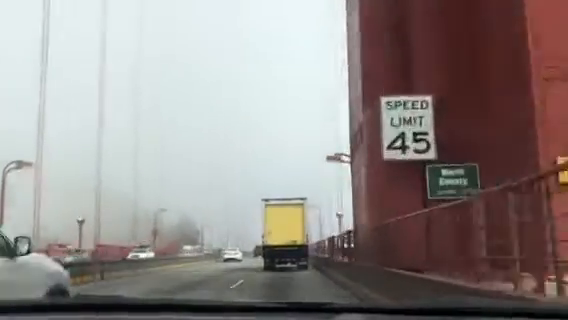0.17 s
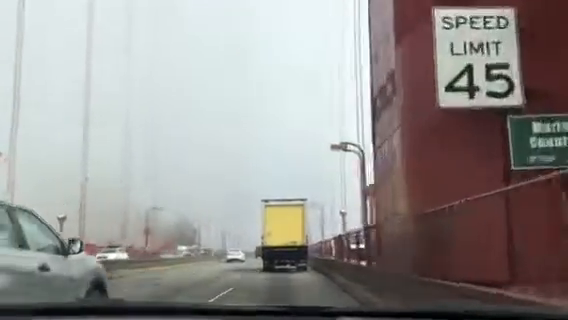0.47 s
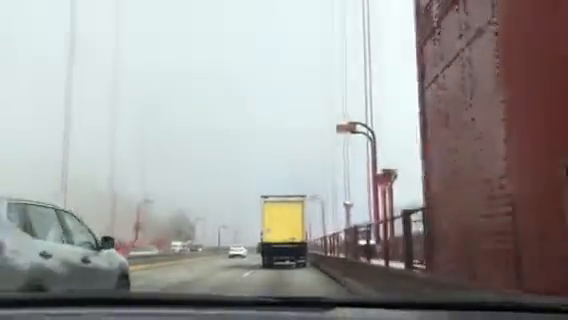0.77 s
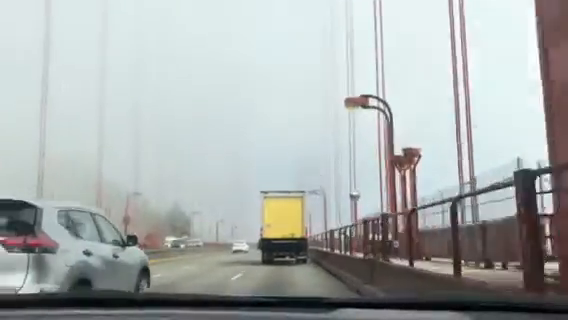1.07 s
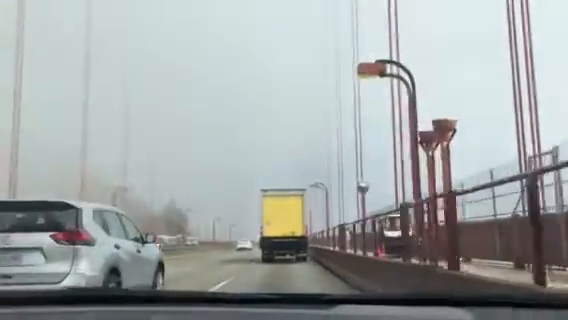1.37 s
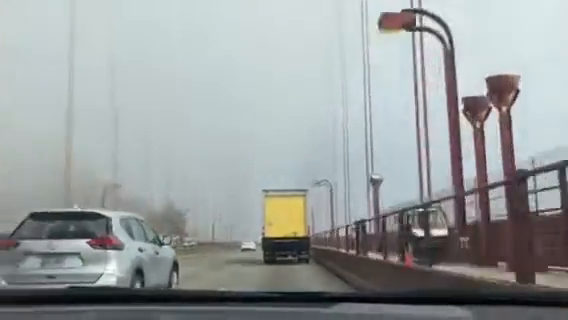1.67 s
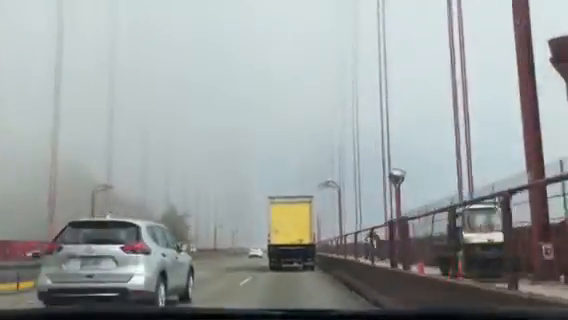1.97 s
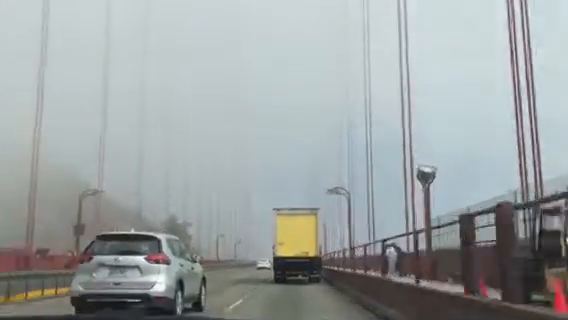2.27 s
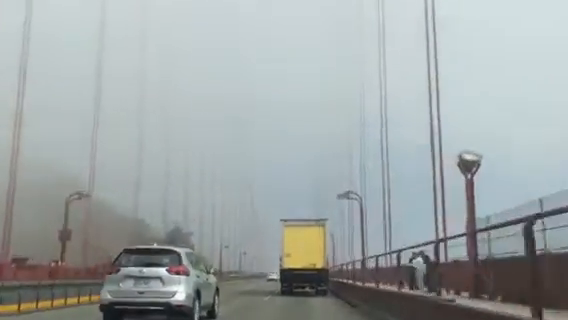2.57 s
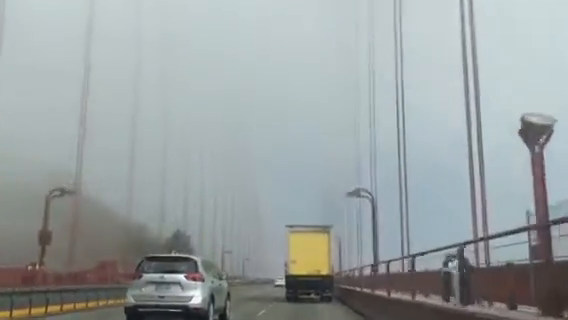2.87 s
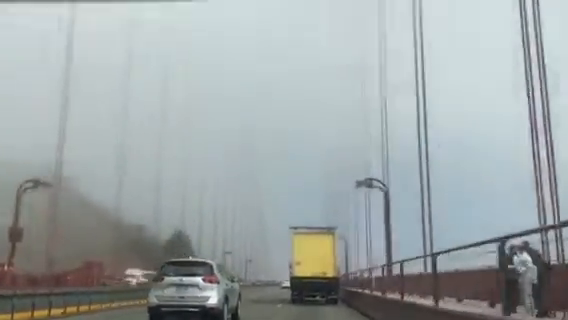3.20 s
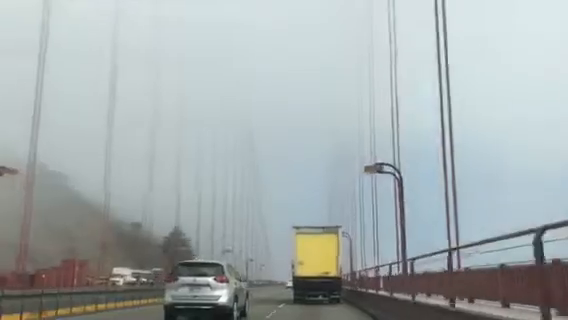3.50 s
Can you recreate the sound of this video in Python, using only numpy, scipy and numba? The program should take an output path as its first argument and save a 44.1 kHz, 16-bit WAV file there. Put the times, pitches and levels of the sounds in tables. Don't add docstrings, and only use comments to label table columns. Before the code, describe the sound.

Steady boomy car cabin rumble on a rough bridge deck, with a clattering bump early on.

```python
import sys
import numpy as np
from scipy import signal
from scipy.fft import rfft, irfft
from scipy.io import wavfile
from scipy.ndimage import uniform_filter1d
from numba import njit

SR = 44100
rng = np.random.default_rng(int(sys.argv[2]) if len(sys.argv) > 2 else 0)


def volts_from_decibels(level):
    exponent = np.asarray(level, float) / 20
    return 10 ** exponent


def store_wav(level_fs):
    pcm = np.round(np.clip(np.atleast_2d(level_fs), -1, 1) * 32767)
    wavfile.write(sys.argv[1], SR, pcm.T.astype(np.int16))


N = 160524
T = np.arange(N) / SR


def unit(x):
    return x / np.sqrt(np.mean(x ** 2))


def noise():
    return rng.standard_normal(N)


def curve(rows):
    return np.interp(T, *np.array(rows).T)


def walk(rate_hz):
    hold = int(SR / rate_hz)
    steps = np.repeat(rng.standard_normal(N // hold + 1), hold)
    return 1.19 * uniform_filter1d(uniform_filter1d(steps, hold), hold)[:N]


def colour(x, shape, tilt_db=0.):
    hz = np.maximum(np.arange(len(x) // 2 + 1) * SR / len(x), 1)
    point_hz, point_db = np.array(shape).T
    gain_db = np.interp(np.log(hz), np.log(point_hz), point_db) + tilt_db * np.log2(hz / 3000)
    gain_db -= 26 * np.maximum(np.log2(point_hz[0] / hz), 0)
    gain_db -= 60 * np.maximum(np.log2(hz / point_hz[-1]), 0)
    return irfft(rfft(x) * volts_from_decibels(gain_db), len(x))


@njit
def svf(x, hz, width_hz):
    y, band, low = np.empty(len(x)), 0., 0.
    for i in range(len(x)):
        g, k = np.tan(np.pi * hz[i] / SR), width_hz / hz[i]
        v = (band + g * (x[i] - low)) / (1 + g * (g + k))
        band, low, y[i] = 2 * v - band, low + 2 * g * v, k * v
    return y


def resonances(rows, flicker_db, rate_hz):
    warm = 8192
    out = []
    for hz, width_hz, db in rows:
        centre_hz = np.pad(hz * (1 + 0.024 * walk(3)), (warm, 0), "edge")
        band = rng.standard_normal(N + warm)
        for _ in range(2):
            band = svf(band, centre_hz, 1.47 * width_hz)
        out.append(unit(band[warm:]) * volts_from_decibels(db + flicker_db * walk(rate_hz)))
    return np.array(out)


# time in seconds, level in dB.
DECK_ROUGHNESS = [(0, -26), (.5, -28), (.7, -27.5), (1.1, -30), (1.3, -28.5), (1.55, -32), (1.85, -24.5),
                  (2.15, -32), (2.4, -30.5), (2.9, -29), (3.3, -28.5), (3.64, -28)]
# centre in Hz, width in Hz, level in dB.
BODY_MODES = [(41.4, 11.4, -1), (64.9, 15, -8.5), (84, 9.8, -5.5), (102.9, 13, -3.5), (128.3, 14, -5.5),
              (163, 19.4, -8), (189.8, 18, -21), (221.6, 30, -15.5), (281.6, 26, -21), (352.6, 46, -16),
              (440.4, 59, -23.5)]


def body():
    upper_follow, lump_db, lumps_per_s = 0.38, 1.2, 22
    deck_db = curve(DECK_ROUGHNESS)
    modes = resonances(BODY_MODES, flicker_db=.4, rate_hz=5.5)
    scale = np.sqrt(np.mean(modes[2:5].sum(0) ** 2))
    upper_db = deck_db.mean() + upper_follow * (deck_db - deck_db.mean())
    low = modes[:5].sum(0) * volts_from_decibels(deck_db + lump_db * walk(lumps_per_s))
    upper = modes[5:].sum(0) * volts_from_decibels(upper_db)
    return (low + upper) / scale


# time in seconds, level in dB.
ROAR_LEVEL = [(0.0, -44.5), (0.26, -44), (.5, -44), (0.77, -42.5), (0.99, -46), (1.15, -45.5), (1.27, -43),
              (1.5, -45.5), (1.72, -43), (1.95, -46.5), (2.15, -46), (2.27, -44.5), (2.4, -46), (3.07, -45),
              (3.24, -44.5), (3.4, -46.5), (3.64, -46.5)]
# centre in Hz, width in Hz, level in dB.
TREAD_MODES = [(596, 89, -5), (699, 95, -1.5), (855, 82, -3), (988, 145, 2), (1245, 63, -9.5),
               (1394, 140, -9.5), (1603, 200, -6), (1945, 230, -19)]
# frequency in Hz, level in dB per Hz.
WIND_SPECTRUM = [(1500, -1.5), (1900, 1.5), (2500, -6.5), (3200, -10.5), (4600, -12.5), (5000, -23.5),
                 (5400, -20), (8500, -27), (9500, -36.5)]


def tyres_and_wind():
    wind_db = -62
    roar_db = curve(ROAR_LEVEL)
    gusts_db = wind_db + roar_db - roar_db.mean() + 0.87 * walk(6.2)
    wind = unit(colour(noise(), WIND_SPECTRUM)) * volts_from_decibels(gusts_db)
    tread = unit(resonances(TREAD_MODES, flicker_db=1.06, rate_hz=9).sum(0))
    return tread * volts_from_decibels(roar_db) + wind


# start in seconds, length in seconds, level in dB, tilt in dB per octave.
RATTLES = [(.507, .035, -64, -1), (.545, .016, -61, -2), (.565, .04, -68, -1), (.642, .012, -61, -1),
           (.652, .01, -57, -2.5), (.672, .022, -60, -2), (.7, .01, -63, 0), (.712, .012, -55, -2),
           (.733, .02, -55, -1), (.76, .01, -64, 6), (.66, .21, -72, 0), (.79, .045, -56, -2),
           (.845, .02, -63, 1), (.875, .025, -67, 1), (.912, .01, -66, 6), (.918, .008, -59, 1),
           (.947, .005, -52, 1), (.958, .014, -66, 8), (.975, .004, -65, 1), (1.003, .03, -67, 1),
           (1.035, .04, -69, 1), (1.1, .2, -70, 0), (2.0, .06, -74, 2)]
# frequency in Hz, level in dB per Hz.
RATTLE_SPECTRUM = [(700, -18), (1200, 3.5), (1700, 1), (2800, -9.5), (4600, -18), (5000, -19),
                   (5400, -21.5), (7500, -32), (10000, -50)]


def joint():
    attack_s, release_s, grain_db, gain_db = 0.0029, 0.015, 2.5, 11.5
    size, grain = 16384, 64
    t = np.arange(size) / SR
    out = np.zeros(N)
    for start_s, length_s, db, tilt_db in RATTLES:
        grains_db = grain_db * np.repeat(rng.standard_normal(size // grain), grain)
        burst = rng.standard_normal(size) * volts_from_decibels(grains_db)
        shape = np.clip(t / attack_s, 0, 1) * np.exp(-np.maximum(t - length_s, 0) / release_s)
        i = int(start_s * SR)
        out[i:i + size] += unit(colour(burst, RATTLE_SPECTRUM, tilt_db)) * shape * volts_from_decibels(db + gain_db)
    return out


def ring(start_s, hz, db, t60_s, rise_s):
    t = np.maximum(T - start_s, 0)
    phase = 2 * np.pi * hz * t + .3 * walk(14)
    envelope = (1 - np.exp(-(t / rise_s) ** 2)) * np.exp(-np.log(1000) * t / t60_s)
    return volts_from_decibels(db) * envelope * np.sin(phase)


# start in seconds, pitch in Hz, level in dB, t60 in seconds.
THUMPS = [(.28, 45, -16, .25), (.28, 90, -14, .15), (.612, 75, -16, .1), (.738, 50, -7, .14),
          (.76, 100, -11, .1), (.787, 52, -11, .14), (.92, 92, -6, .14), (.972, 80, -10, .11),
          (1.012, 62, -7, .16), (1.147, 52, -11, .15), (1.61, 110, -17, .12), (1.795, 90, -14, .16),
          (1.98, 110, -15, .09), (2.026, 100, -13, .09), (2.232, 78, -16, .12), (2.295, 52, -15, .16),
          (2.4, 115, -18, .1), (2.6, 70, -17, .08), (2.655, 90, -19, .1), (2.95, 110, -19, .1),
          (3.13, 75, -18, .1), (3.247, 62, -10, .16), (3.29, 70, -14, .15), (3.47, 60, -15, .13),
          (3.5, 110, -15, .1), (3.595, 85, -16, .1), (1.63, 50, -16, .2), (.32, 42, -17, .2)]


def wheel_thumps():
    return sum(ring(*row, rise_s=.008) for row in THUMPS)


# start in seconds, pitch in Hz, level in dB,
# t60 in seconds, rise in seconds.
RINGS = [(.74, 1570, -33, .07, .005), (.802, 4410, -44, .08, .006), (.812, 1230, -32, .16, .012),
         (.916, 350, -27, .1, .006), (.745, 355, -28, .12, .01), (.949, 1500, -29, .05, .003),
         (1.084, 960, -34, .12, .003), (1.716, 665, -32, .11, .008), (1.716, 890, -32, .08, .01),
         (1.79, 600, -28, .09, .012), (2.268, 672, -30, .12, .01), (.96, 5400, -52, .05, .003),
         (.51, 3900, -50, .08, .008), (.75, 830, -33, .1, .008), (.795, 2850, -44, .06, .005),
         (.962, 6900, -58, .04, .003), (.846, 4500, -52, .06, .004), (.878, 4550, -58, .09, .005),
         (.942, 4250, -52, .07, .005), (.52, 2900, -50, .08, .008), (2.451, 720, -29, .04, .002),
         (2.05, 1020, -38, .05, .002), (2.27, 950, -38, .1, .01), (.826, 1150, -33, .06, .004)]


def trim_rings():
    return sum(ring(*row) for row in RINGS)


# start in seconds, centre in Hz, level in
# dB, decay in seconds.
SEAMS = [(.66, 450, -44, .03), (.742, 300, -34, .025), (.748, 750, -37, .02), (.92, 300, -38, .02),
         (1.715, 620, -41, .02), (1.765, 760, -38, .04), (2.265, 780, -41, .03), (2.45, 740, -36, .006),
         (2.051, 1000, -45, .008), (1.084, 950, -44, .01), (.508, 3900, -52, .02), (.52, 3300, -51, .02),
         (.534, 3900, -53, .03), (.654, 3800, -55, .015), (.685, 3000, -54, .012), (.716, 3500, -54, .015),
         (.8, 3300, -53, .025), (.815, 1400, -42, .025), (1.79, 720, -39, .02)]


def seam_knocks():
    out = np.zeros(N)
    for start_s, hz, db, decay_s in SEAMS:
        t = np.maximum(T - start_s, 0)
        pan = unit(colour(noise(), [(hz * 0.65, -6), (hz, 0), (hz * 1.18, -3), (hz * 1.3, -20)]))
        out += pan * volts_from_decibels(db) * np.clip(t / 0.00093, 0, 1) * np.exp(-t / decay_s)
    return out


# start in seconds, length in seconds, pitch in Hz, level in dB.
BOOMS = [(.95, .11, 160, -21.5), (1.045, .1, 163, -21), (.725, .06, 285, -34), (.77, .055, 135, -20),
         (2.445, .11, 126, -23), (1.76, .12, 115, -25), (3.2, .2, 41, -24), (1.772, .045, 695, -34),
         (1.765, .045, 830, -43), (1.785, .03, 385, -37), (3.5, .12, 175, -28), (2.74, .14, 170, -30)]


def panel_booms():
    out = np.zeros(N)
    for start_s, length_s, hz, db in BOOMS:
        swell = np.sin(np.pi * np.clip((T - start_s) / length_s, 0, 1)) ** 1.3
        out += volts_from_decibels(db) * swell * np.sin(2 * np.pi * hz * T + .5 * walk(6.3))
    return out


# time in seconds, peak in dB.
TICKS = [(0.289, -69.5), (.607, -72.5), (1.804, -68), (2.053, -69.5), (2.253, -66.5), (2.6, -80),
         (2.805, -71.5), (2.902, -81), (3.404, -75), (3.501, -71.5)]


def ticks():
    decay_s, buzz_per_s, buzz_db, scatter_db = 0.0031, 40, -73.5, 4.5
    spectrum = [(3500, -4.5), (6000, -3), (9000, -6.0), (10000, -22.0), (13000, -28), (15500, -19.5)]
    kicks = np.zeros(N)
    at_s = np.arange(.003, N / SR, 1 / buzz_per_s)
    kicks[(at_s * SR).astype(int)] = volts_from_decibels(buzz_db + scatter_db * rng.standard_normal(len(at_s)))
    for s, db in TICKS:
        kicks[int(s * SR)] = volts_from_decibels(db)
    envelope = signal.lfilter([1], [1, -np.exp(-1 / (decay_s * SR))], kicks)
    return envelope * unit(colour(noise(), spectrum))


# frequency in Hz, level in dB per Hz.
HISS_SPECTRUM = [(4000, -3.5), (8000, -4.5), (9800, -6.5), (10500, -9.5), (11400, -6.5), (15600, -7)]


def phone_hiss():
    loud = (T > .742) & (T < 1.562)
    return unit(colour(noise(), HISS_SPECTRUM)) * volts_from_decibels(np.where(loud, -70.5, -81))


# frequency in Hz, level in dB (the sine peaks 1 dB above it).
WHINE = [(5959, -98.5), (6955, -99), (7946, -100), (8942, -101), (9932, -102), (10928, -104), (11919, -103),
         (12915, -104), (13905, -106), (14890, -107)]


def circuit_whine():
    return sum(volts_from_decibels(db + 1) * np.sin(2 * np.pi * hz * T) for hz, db in WHINE)


def scene():
    road = body() + tyres_and_wind() + joint()
    hits = wheel_thumps() + trim_rings() + seam_knocks() + panel_booms()
    return (road + hits + ticks())[None]


def band_limit(x):
    return signal.sosfilt(signal.butter(12, 15720, fs=SR, output="sos"), x)


def record(dry):
    bass_cut = signal.butter(2, 25.3, "high", fs=SR, output="sos")
    mic = signal.sosfiltfilt(bass_cut, dry)
    return band_limit(mic + phone_hiss() + circuit_whine())


dry = scene()
out = record(dry)
store_wav(out)
```